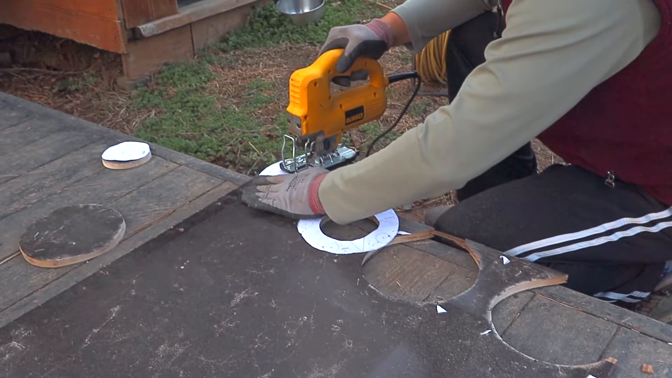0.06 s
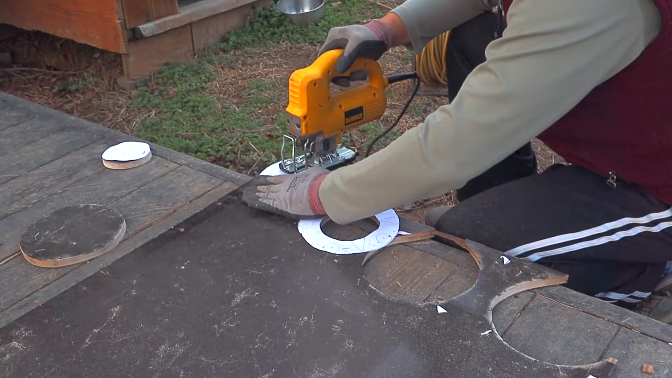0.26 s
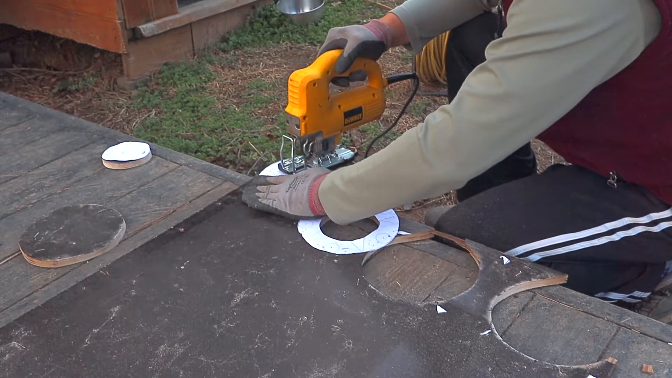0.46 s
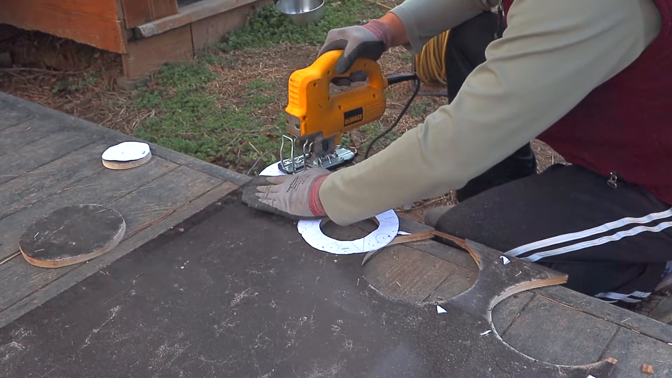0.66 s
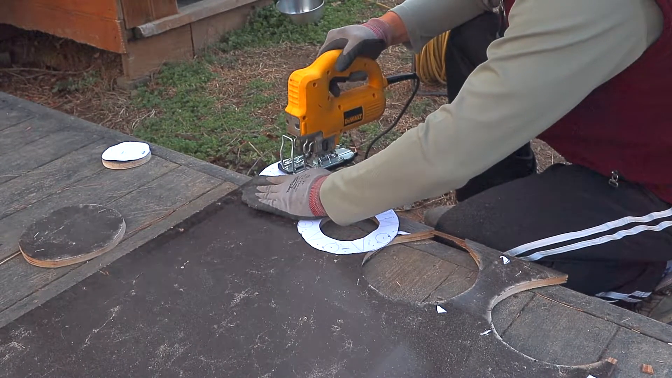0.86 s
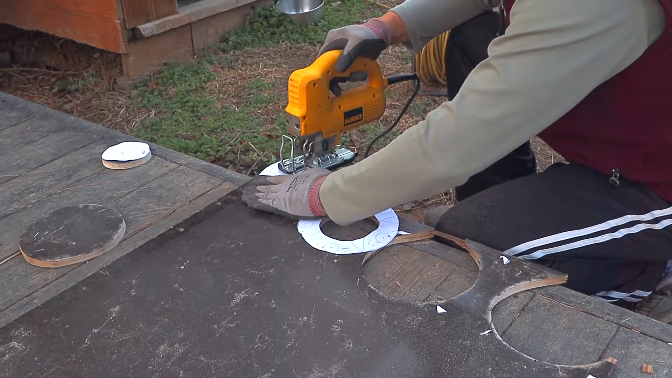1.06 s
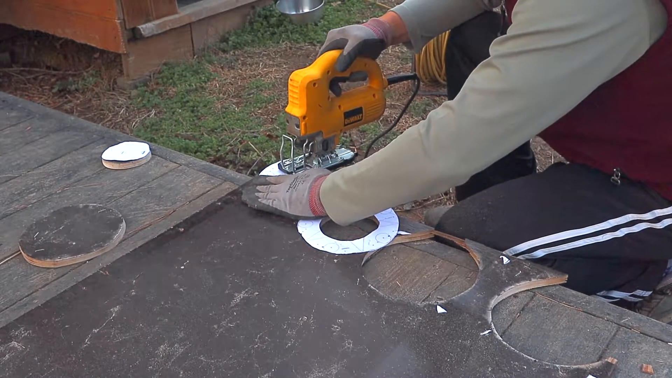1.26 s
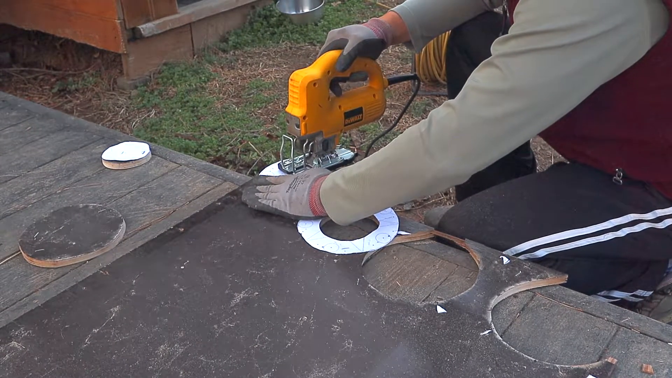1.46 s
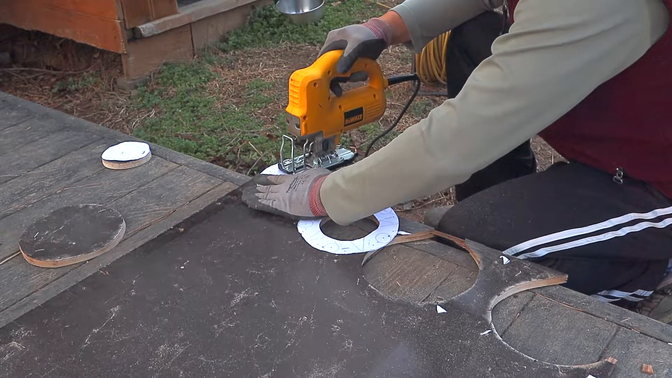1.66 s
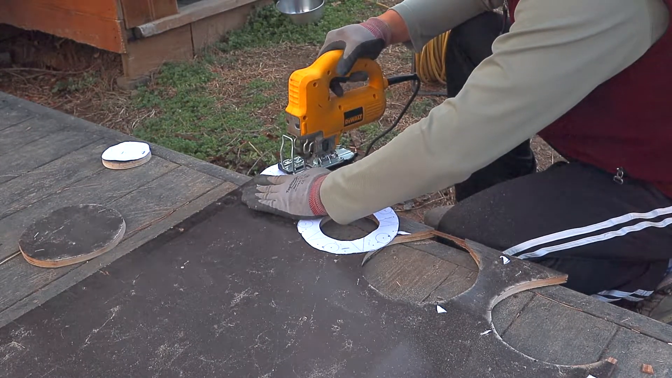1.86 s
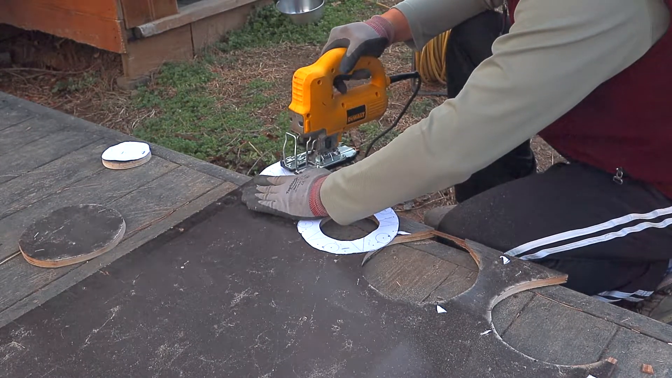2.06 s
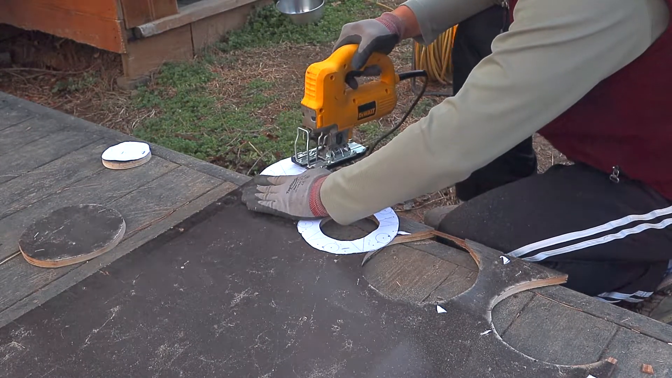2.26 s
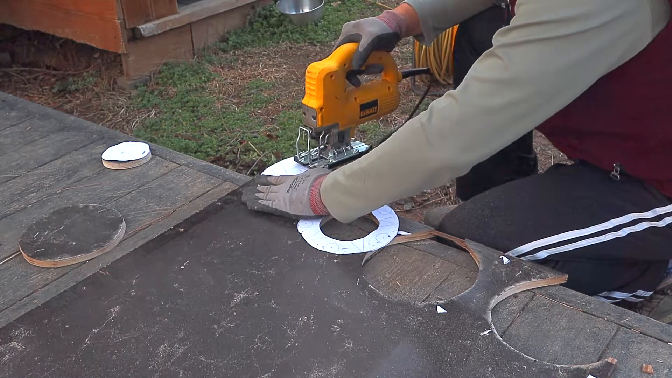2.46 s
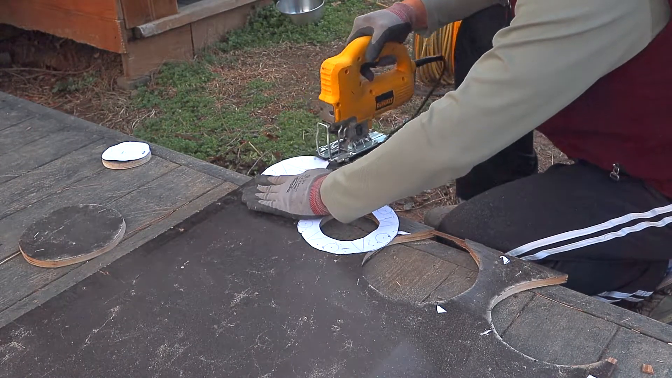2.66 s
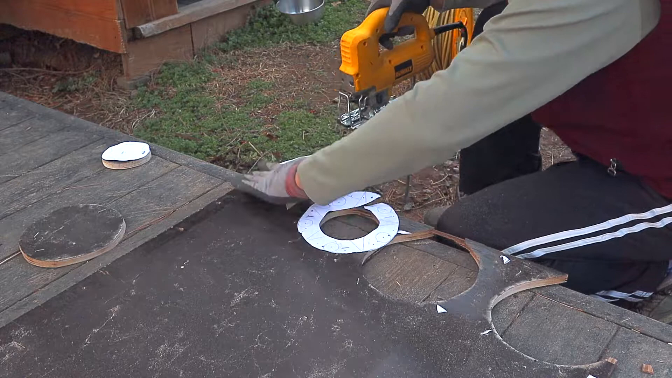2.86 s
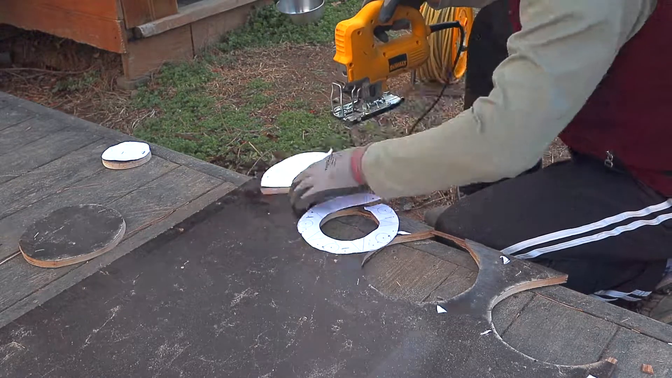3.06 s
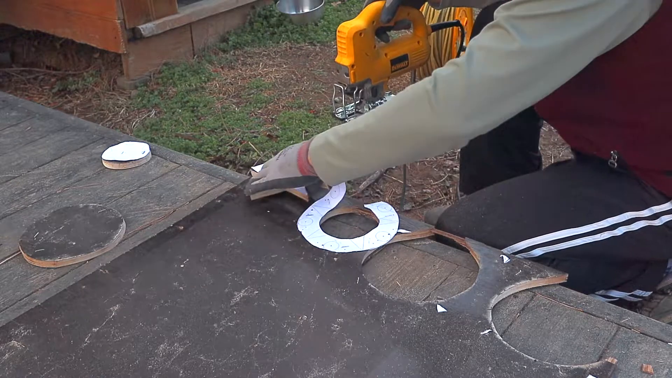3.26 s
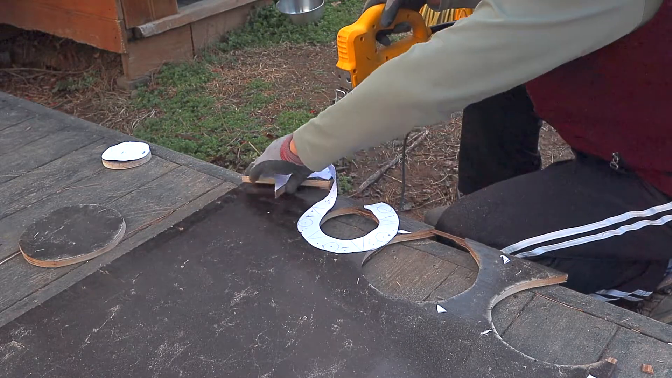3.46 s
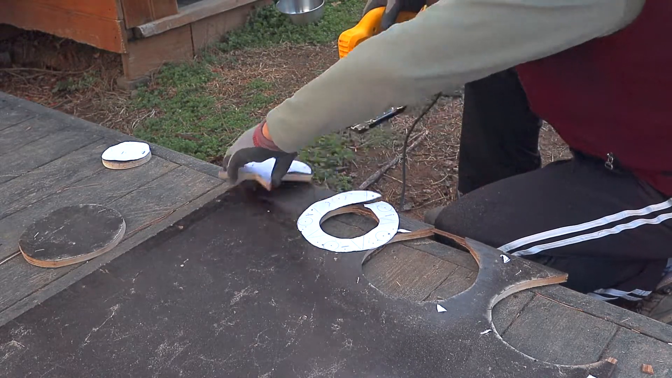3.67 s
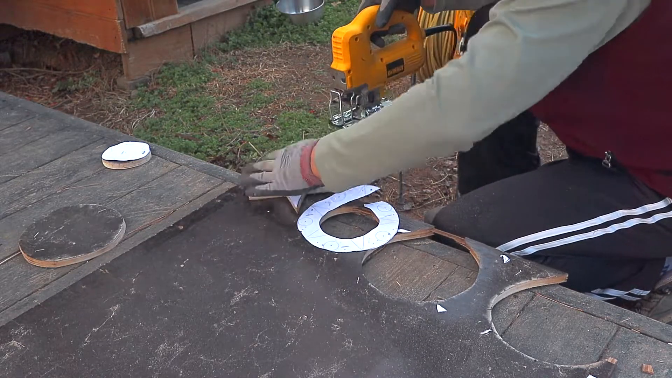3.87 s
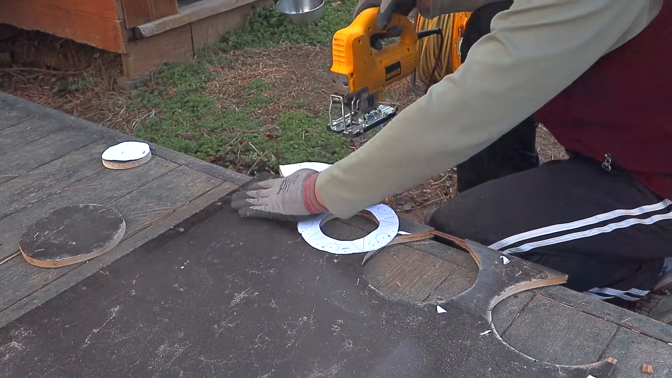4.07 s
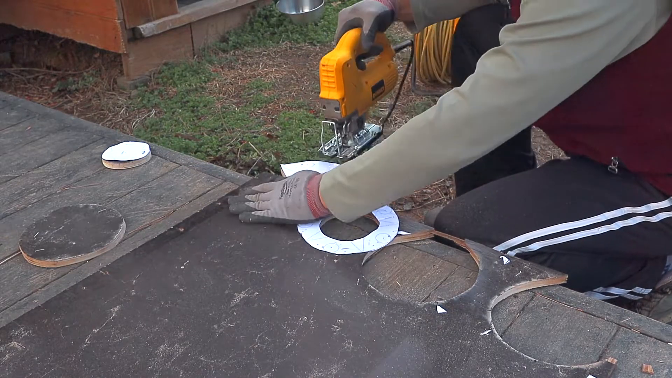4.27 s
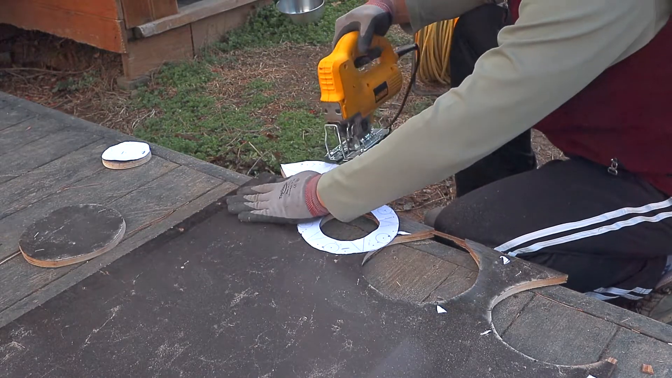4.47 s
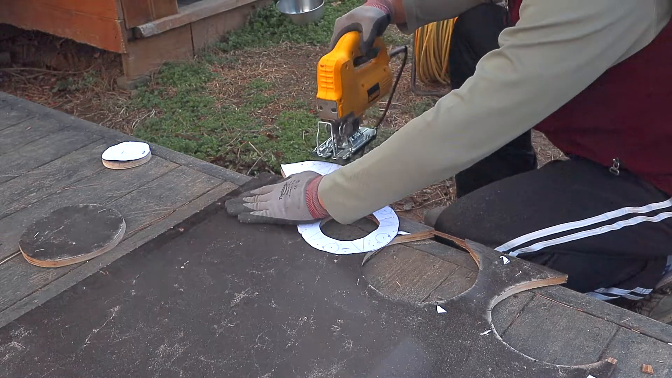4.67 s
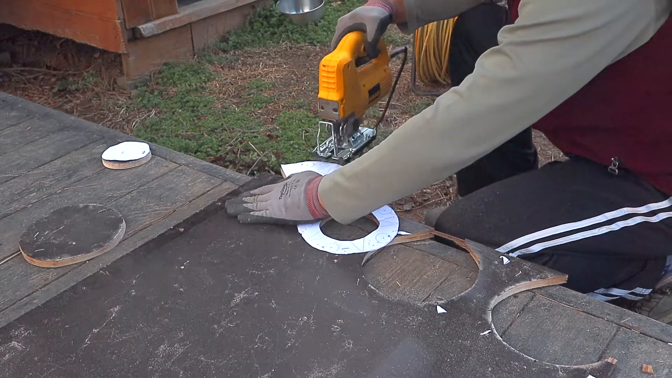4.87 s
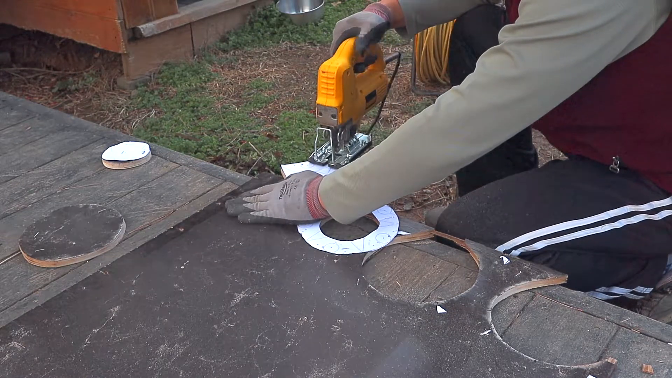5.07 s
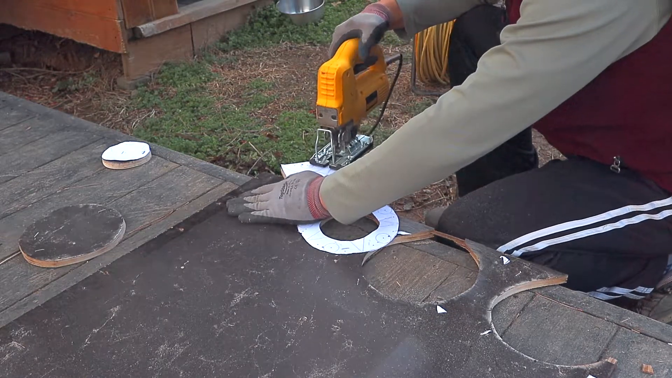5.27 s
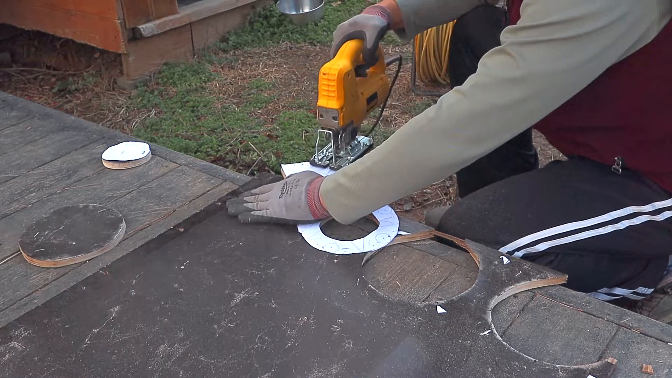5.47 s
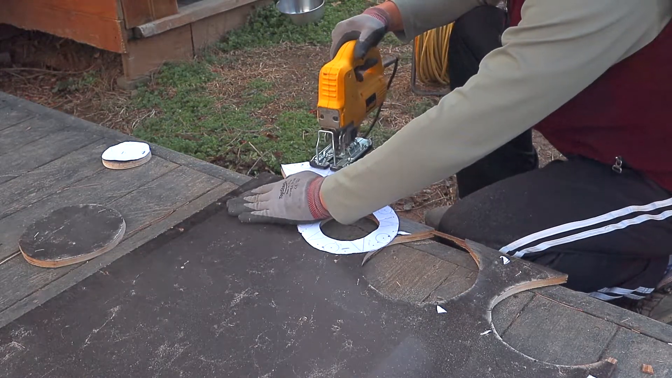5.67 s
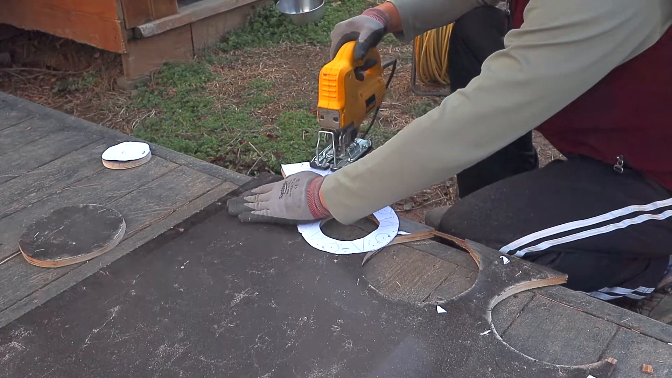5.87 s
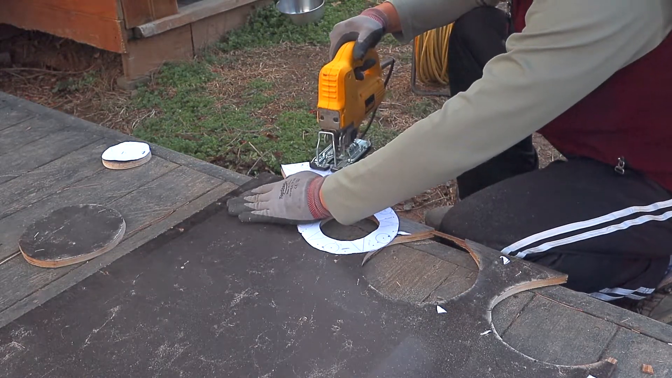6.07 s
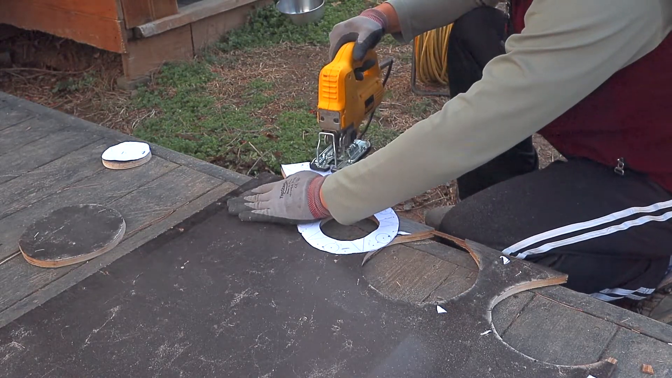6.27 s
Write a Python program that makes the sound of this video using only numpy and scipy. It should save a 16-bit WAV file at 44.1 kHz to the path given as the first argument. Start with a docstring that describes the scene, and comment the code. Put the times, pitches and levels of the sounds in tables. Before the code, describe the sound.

Outdoors, a buzzing jigsaw finishes a metal cut and winds down; after clanks, sliding and faint bird calls it restarts with a sharp whine.

```python
"""Jigsaw in sheet metal

A corded jigsaw finishes a cut in thin sheet metal on a wooden deck outdoors and coasts to a stop;
the cut ring is knocked and slid while a bird calls far off, then the saw restarts and touches the metal.
One stroke rate drives all tones, clacks and slaps of the saw. Blows excite decaying modes of the sheet,
sliding is filtered noise, the bird is a harmonic glide, and the air is shaped noise with a faint hum."""
import sys
import numpy as np
from scipy import signal
from scipy.fft import rfft, irfft, next_fast_len
from scipy.io import wavfile
from scipy.ndimage import uniform_filter1d

SR = 44100
rng = np.random.default_rng(int(sys.argv[2]) if len(sys.argv) > 2 else 0)


def store_pcm(level_fs):
    """Save levels as 16-bit WAV."""
    pcm = np.round(np.clip(level_fs, -1, 1) * 32767).astype(np.int16)
    wavfile.write(sys.argv[1], SR, np.atleast_2d(pcm).T)


N = 278271
TIME = np.arange(N) / SR

# outdoor air: f/Hz, relative spectral level/dB
AIR_SPECTRUM = [(30, -13), (50, -3.5), (110, -3), (230, 3.5), (330, 1.5), (430, 3), (560, -2.5),
                (1200, -4.5), (2200, -2), (3500, -10), (8000, -16), (16000, -16)]
AIR_DB = -51.5
HUM_HZ, HUM_DB = 394.5, -54  # mean pitch and level; both waver

# speed of the blade as the cut gives way: t/s, stroke rate/(1/s)
CUT_STROKE_RATE = [(0, 95.6), (.33, 96.0), (.42, 96.6), (.56, 97.3), (.7, 99.5)]
# coasting: switch-off, air-drag time constant (s), dry friction (strokes per s lost each second)
OFF_S, DRAG_S, FRICTION_PER_S = .773, 1.578, 37.0
# restart (s), free speed (strokes per s), then share and time constant (s) of two run-up stages
ON_S, FREE_SPEED = 4.443, 101.8
QUICK_SHARE, QUICK_S, SLOW_SHARE, SLOW_S = .83, .112, .17, .34
# one brief dip of the whine's pitch: centre (s), half length (s), depth (strokes per s)
DIP_S, DIP_LENGTH_S, DIP_DEPTH = 5.195, .04, 4.2
GEAR_RATIO = 9.07  # armature turns per stroke
QUIET_SPEED = (3.8, 39)  # strokes per s below which parts hardly sound, (first, second) run

# the saw heard from its side, then from its front: f/Hz, relative spectral level/dB
SIDE_SPECTRUM = [(60, -62), (150, -38), (400, -12.5), (850, -4.5), (1250, 4.5), (1600, 4.5), (2350, 3),
                 (2650, 9), (3400, 11), (4050, 8), (4900, 11), (5700, 6.5), (6400, 8.5), (7350, 7.5),
                 (8200, -1.5), (9300, -2), (10600, 2), (11100, -7.5), (11900, -4.5), (13800, -5.5),
                 (14800, -6), (15700, -3)]
FRONT_SPECTRUM = [(100, -69), (450, -17), (800, -9), (1150, -3), (2300, -2), (2600, 1.5), (3500, 5),
                  (4750, 4.5), (5200, 2), (5800, 5), (7000, 5), (8450, -5), (9300, 4.5), (10300, -1),
                  (11400, -6.5), (12400, -3), (13600, -3.5), (15600, -0.5)]
# resonances of guide and housing: f/Hz, bandwidth/Hz, relative level/dB
HOUSING_MODES = [(390, 16, 21.5), (1230, 78, 7.5), (3540, 76, 1), (4840, 220, 3), (6440, 123, 5.5),
                 (10560, 69, -0.5)]
# resonances of blade and guard, heard toward the front: f/Hz, bandwidth/Hz, relative level/dB
GUARD_MODES = [(2544, 33, 11), (2734, 30, 17), (3400, 130, 4), (4300, 35, 16.5), (4770, 130, -1),
               (6600, 230, -19), (9200, 190, -6.5), (9760, 390, -8)]
# passages where the parts rattle harder: t/s, half length/s, gain/dB
JOLTS_OF_RATTLE = [(0.827, 0.12, 2), (4.535, 0.025, 1)]
# base level at free speed in the (first, second) run in dB, and the power of speed it grows with
RATTLE_DB, RATTLE_POWER = (-26.5, -24), 0.45
BODY_DB, BODY_POWER = (-27, -22.5), 0.31
HISS_DB, HISS_POWER = (-31, -25), 0.73
CUT_DAMPING_DB = -0.5  # the sheet steadies the blade and damps its rattle
REPEAT_DB = (-1, 3)  # part of each clack alike on every stroke, (first, second) run
# gains at restart from the starting torque, and its decay time constant
SURGE_BODY_DB, SURGE_RATTLE_DB, SURGE_HISS_DB, SURGE_WHINE_DB, SURGE_S = 10, 14.5, 10, 16, 0.39

# hum of the armature: multiple of armature rate, relative level/dB
ARMATURE_HARMONICS = [(1, 0), (2, -8), (3, -1)]
# growl under the starting current: multiple of armature rate, relative level/dB
START_HARMONICS = [(1, -.5), (3, -2), (12, 7)]
# whine of the armature: multiple of armature rate, relative level/dB
WHINE_HARMONICS = [(18, 0)]
ARMATURE_DB, ARMATURE_POWER = (-52, -45), 0.48
# second tone: multiple of the stroke rate, level in the (first, second) run
OVERHUM_RATIO, OVERHUM_DB = 9.65, (-45.5, -47)
START_DB, START_FADE_DB_PER_S = -30, 32
WHINE_DB, WHINE_POWERS = (-34, -33.5), (2.4, 1.0)  # before swell and surge; (first, second) run
# the whine swells near a motor resonance: centre and half width (strokes per s), gain
SWELL_SPEED, SWELL_WIDTH, SWELL_DB = 96, 5.7, 14.5

# sheet flapping on the boards: f/Hz before the pinch, bandwidth/Hz, relative level/dB
FLAP_MODES = [(178, 25, -0.5), (298, 44, -3.5), (533, 126, -1.5), (712, 79, -2.5), (1157, 120, 0),
              (1650, 87, 7.5), (1746, 125, 4), (2100, 250, -2), (2610, 130, -6.5), (2900, 180, -8.5),
              (3670, 130, -11), (3600, 2500, -16)]
# upper sheet resonances as the blade nears the edge: t/s, frequency factor, level change/dB
PINCH_CURVE = [(0, 1.02, 0.5), (.15, 1.0, -0.5), (.205, 1, -4), (.25, 1.0, -2), (.42, 0.97, 0),
               (.5, 1.01, 0.5), (.57, 1.11, 0), (.64, 1.04, -2.5), (.69, 0.88, -14)]
PINCH_ABOVE_HZ, SHIFT_ABOVE_HZ = 1000, 1450  # level and pitch change only above these
# hard first strokes: until (s), easing over (s), affected above (Hz), gain
HARD_BITE_S, HARD_BITE_EASE_S, HARD_BITE_ABOVE_HZ, HARD_BITE_DB = .21, .06, 2400, 4
# the blade bites ever more lightly and leaves the sheet; release ends at CUT_END_S
BITE_DB, BITE_EASE_DB_PER_S, CUT_END_S, CUT_RELEASE_S = -27.5, 5.5, 0.74, 0.1
# running blade touching the metal: start t/s, length/s, level/dB
BLADE_TOUCHES = [(6.132, 0.15, -40), (6.248, 0.077, -32.5)]
TOUCH_GRIT_DB = 1  # teeth grazing the edge

# body shake heard from the side: multiple of stroke rate, relative level/dB
SIDE_SHAKE_HARMONICS = [(1, -9), (2, -6), (3, 0), (4, -1), (5, 0), (6, -3), (7, -4), (8, -2), (10, -3),
                        (11, -3), (12, -3)]
# body shake heard from the front: multiple of stroke rate, relative level/dB
FRONT_SHAKE_HARMONICS = [(1, -2), (2, -9), (5, 1), (6, 1), (7, 6), (10, 10), (11, 12), (12, 11), (17, 5),
                         (21, 5), (24, 13), (25, 14), (29, 13), (36, 14), (39, 14), (41, 14), (45, 13)]
SHAKE_DB, SHAKE_POWER = (-53.5, -58), 0.34

# bearing song: multiple of ball-passing rate, relative level/dB
BEARING_HARMONICS = [(1, -7), (2, -7), (3, -6), (4, 2), (5, -5), (6, -8), (7, -8), (8, -10)]
# balls slip more at speed: stroke rate/(1/s), balls passing per armature turn
BALLS_PER_TURN = [(10, 9.1), (50, 8.47)]
# knocks of the slowing slider in its guide: t/s, click level/dB
GUIDE_KNOCKS = [(1.762, -19), (1.783, -22), (1.802, -19), (1.843, -13), (1.889, -13), (1.902, -20),
                (1.941, -14), (1.971, -21), (2.003, -21), (2.037, -19), (2.079, -21), (2.11, -23)]
# the song weakens above this speed (strokes per s); base level, power of speed
BEARING_SPEED, BEARING_DB, BEARING_POWER = 76, -32.5, .42
# balls skid loudest near rest: centre and half width (strokes per s), gain
SQUEAL_SPEED, SQUEAL_WIDTH, SQUEAL_DB = 8, 8.5, 9

# stick-slip groans of the sheet: start t/s, length/s, f/Hz, level/dB
SHEET_GROANS = [(2.214, 0.015, 495, -39), (2.529, 0.036, 513, -32), (2.645, 0.024, 517, -38),
                (2.663, 0.025, 520, -33)]
# overtones of a groan: multiple of its pitch, relative level/dB
GROAN_HARMONICS = [(1, 0), (2, -3.5), (3, -16)]
# sheet and saw knocking on the deck: t/s, level/dB, brightness/dB per range, board thump/dB
DECK_KNOCKS = [(2.214, -43, -12, -42), (2.315, -60, 22, -70), (2.533, -39, -11.5, -40.5),
               (2.582, -29.5, 5, -45), (2.688, -27, 8, -39), (2.701, -34.5, 21, -62), (2.718, -30, 13, -41),
               (2.733, -34, 1, -40), (3.101, -29, 2, -37), (3.136, -8.5, -2, -31), (3.165, -41, -6, -31.5),
               (3.305, -28.5, 14, -45), (3.387, -41, 12, -54), (3.825, -19, 6, -50), (3.832, -36, 7, -26.5),
               (3.885, -30.5, 2, -44), (4.047, -38.5, -14, -59), (4.065, -18, -2.5, -23.5),
               (4.117, -27, 2, -44), (4.147, -33, -4, -61), (4.182, -33, 1, -50), (4.355, -47, 13, -55),
               (4.362, -47, 11, -60), (4.368, -52, 7, -62), (4.396, -28, 10.5, -36.5),
               (4.454, -28.5, 3, -57), (4.463, -31.5, 10, -54), (4.471, -32, -8, -58)]
# the four ranges of a knock: low f/Hz, high f/Hz, t60/s, relative level/dB
KNOCK_RANGES = [(108, 276, 0.26, 0), (360, 2600, 0.07, -3), (1560, 5600, 0.03, -4),
                (5030, 14000, 0.019, -7)]
# modes of the sheet lying on the boards: f/Hz, relative level/dB, t60/s
SHEET_MODES = [(128, -5.5, 0.12), (166, -3.5, 0.35), (216, 7.5, 0.12), (455, 1.5, 0.15), (503, 4.5, 0.086),
               (787, -1.5, 0.088), (1023, -4, 0.088), (1264, -3.5, 0.051), (1697, -2, 0.039),
               (2186, 5, 0.019), (2960, 8.5, 0.0074), (3680, 7, 0.0086), (4170, 0, 0.021),
               (4020, -11, 0.048), (5300, -12.5, 0.054), (6350, -18, 0.098)]
KNOCK_RING_DB = 4  # the sheet rings most readily in the upper middle range
# distant bird calls: t/s, length/s, target f/Hz, level/dB
BIRD_CALLS = [(2.24, 0.1, 1140, -47), (2.639, 0.045, 1210, -46), (3.399, 0.068, 1077, -37.5),
              (3.539, 0.082, 1145, -42), (3.727, 0.085, 1090, -42), (4.194, 0.074, 1110, -48.5)]
# overtones of the call: multiple of its pitch, relative level/dB
BIRD_HARMONICS = [(1, -5), (2, 4), (3, -14), (4, -9)]
BIRD_SCOOP, BIRD_SCOOP_S = 0.1236, 0.0179  # start below pitch (share), time constant of the rise
# metal and glove sliding: start t/s, length/s, rumble level/dB, hiss level/dB
SLIDING_PUSHES = [(2.641, 0.13, -31.5, -42), (2.683, 0.022, -40, -28), (2.845, 0.14, -47, -46),
                  (3.242, 0.1, -42, -42), (3.347, 0.25, -48.5, -41), (3.559, 0.23, -48, -42.5),
                  (3.625, 0.06, -71, -37), (4.025, 0.21, -33, -29.5), (4.054, 0.055, -30, -49),
                  (4.21, 0.22, -54.5, -50.5)]
# rumble of the boards: f/Hz, relative spectral level/dB
RUMBLE_SPECTRUM = [(30, -8), (50, 17), (90, 1), (160, 11.5), (300, 7), (600, 8.5), (1200, 12), (2400, 10),
                   (4000, -19), (8000, -38)]
# hiss of the sliding metal: f/Hz, relative spectral level/dB
HISS_SPECTRUM = [(500, -32), (1500, -9), (3000, 0.5), (6000, -2), (8000, -1.5), (10300, -4.5),
                 (13000, -6.5), (15700, -1)]
PUSH_RISE, PUSH_FALL = 0.29, 0.47  # shares of the length of a push
# resonances of the saw's shoe: f/Hz, bandwidth/Hz, relative level/dB
SHOE_MODES = [(1570, 360, 2), (2160, 100, -8), (2690, 130, -2), (4220, 140, 2), (5670, 200, -1),
              (8050, 300, 3), (10000, 1100, 5.5), (12000, 900, 0), (14300, 1800, -9)]
SKID_S, SKID_LENGTH_S, SKID_DB = 4.05, 0.17, -26.5
CUTOFF_HZ = 15780


def from_db(db):
    """Logarithmic level: 20 dB is a tenfold amplitude."""
    return 10 ** (np.asarray(db) / 20)


def rms_one(x):
    """Normalization of power: scale to rms 1."""
    return x / np.sqrt(np.mean(x ** 2) + 1e-20)


def steady_level(x):
    """Short-time power: rms over a tenth of a second."""
    return np.sqrt(uniform_filter1d(x ** 2, SR // 10) + 1e-12)


def in_time(rows):
    """Linear interpolation: the columns of a curve at every sample."""
    s, *columns = np.transpose(rows)
    return [np.interp(TIME, s, c) for c in columns]


def drift(rate):
    """Random modulation of spread 1: Gaussian values joined by lines, rate of them per second."""
    knots = rng.standard_normal(N // 20)
    return np.interp(TIME * rate, np.arange(len(knots)), knots) * np.sqrt(3 / 2)


def band(x, low_hz, high_hz):
    """Band-pass filtering: keep the energy between two frequencies."""
    edges = [low_hz, min(high_hz, SR / 2 - 100)]
    return signal.sosfilt(signal.butter(3, edges, "band", fs=SR, output="sos"), x)


def colour(x, spectrum):
    """Spectral shaping: weight the Fourier components of a noise; rms 1."""
    size = next_fast_len(N)
    hz, db = np.transpose(spectrum)
    bins = np.maximum(np.arange(size // 2 + 1) * SR / size, 1)
    gain = from_db(np.interp(np.log(bins), np.log(hz), db)) * np.minimum(bins / hz[0], 1) ** 2
    return rms_one(irfft(rfft(x, size) * gain, size)[:N])


def resonate(x, modes):
    """Modal superposition: parallel damped resonators with alternating signs."""
    out = 0
    for k, (hz, width, db) in enumerate(modes):
        r = np.exp(-np.pi * width / SR)
        poles = [1, -2 * r * np.cos(2 * np.pi * hz / SR), r * r]
        ringing = signal.lfilter([1, 0, -1], poles, x + 1e-18)
        out = out + (-1) ** k * from_db(db) * (1 - r * r) / 2 * ringing
    return out


def contacts(turns, jitter_s, spread_db):
    """Periodic impact: one click per whole turn, uneven in time and strength."""
    at = np.flatnonzero(np.diff(np.floor(turns)) > 0)
    chance = rng.standard_normal((N // 40, 2))[:len(at)]
    late = np.round(chance[:, 0] * jitter_s * SR).astype(int)
    clicks = np.zeros(N)
    clicks[np.clip(at + late, 0, N - 1)] = from_db(spread_db * chance[:, 1])
    return clicks


def burst(clicks, decay_s):
    """Impact noise: each click sets off an exponentially decaying puff of noise."""
    envelope = signal.lfilter([1], [1, -np.exp(-1 / (decay_s * SR))], clicks + 1e-18)
    return envelope * rng.standard_normal(N)


def tones(turns, orders, waver_db, waver_hz, slip):
    """Rotational harmonics, wavering in level and phase; those above half the sample rate are silent."""
    play = slip * drift(160)  # in turns, shared by all lines
    rate = np.gradient(turns) * SR
    lines = 0
    for k, db in orders:
        level = from_db(db + waver_db * drift(waver_hz)) * (k * rate < SR / 2)
        lines = lines + level * np.sin(2 * np.pi * (round(k) * (turns + play) + rng.random()))
    return lines


def by_run(first, second):
    """Step in time: one value until the saw is switched on again, another after."""
    return np.where(TIME < ON_S, first, second)


def gain_at(speed, run_db, power):
    """Power law of machine noise: gain grows with speed and vanishes near standstill."""
    moving = 1 - np.exp(-(speed / by_run(*QUIET_SPEED)) ** 3)
    return from_db(by_run(*run_db)) * (speed / FREE_SPEED + 1e-9) ** power * moving


def push(start, length):
    """Force envelope: swell, hold and ease of one push."""
    u = (TIME - start) / length
    return np.clip(np.minimum(u / PUSH_RISE, (1 - u) / PUSH_FALL), 0, 1)


def in_cut():
    """Contact condition: 1 while the blade is in the sheet, 0 once it is free."""
    return np.clip((CUT_END_S - TIME) / CUT_RELEASE_S, 0, 1)


def surge():
    """Starting torque: 1 when the saw is switched on again, then exponential decay."""
    return by_run(0, np.exp(-np.maximum(TIME - ON_S, 0) / SURGE_S))


def blade_speed():
    """Drag and dry friction slow the blade to rest; exponential stages run it up (strokes per s)."""
    friction = FRICTION_PER_S * DRAG_S
    fade = np.exp(-np.maximum(TIME - OFF_S, 0) / DRAG_S)
    first = (in_time(CUT_STROKE_RATE)[0] + friction) * fade - friction
    since_on = np.maximum(TIME - ON_S, 0)
    quick = QUICK_SHARE * (1 - np.exp(-since_on / QUICK_S))
    slow = SLOW_SHARE * (1 - np.exp(-since_on / SLOW_S))
    dip = DIP_DEPTH * np.exp(-((TIME - DIP_S) / DIP_LENGTH_S) ** 2)
    return np.maximum(by_run(first, FREE_SPEED * (quick + slow) - dip), 0)


def yard():
    """Ambient sound: broadband noise of outdoor air and a faint hum with slight wavering."""
    level = from_db(HUM_DB + 1.2 * drift(3))
    hum = level * np.sin(2 * np.pi * np.cumsum(HUM_HZ + .8 * drift(8)) / SR)
    return from_db(AIR_DB) * colour(rng.standard_normal(N), AIR_SPECTRUM) + hum


def clacking(turns, repeat_db):
    """Impact at both ends of the slider's travel: part noise, part one ring repeated every stroke."""
    out, t = 0, np.arange(SR // 100) / SR
    for end in (0, .5):
        hits = contacts(turns - end, jitter_s=.00005, spread_db=1.3)
        ring = rng.standard_normal(len(t)) * np.exp(-t / 0.0016)
        repeated = signal.oaconvolve(hits, ring)[:N]
        out = out + burst(hits, decay_s=0.0014) + from_db(repeat_db) * repeated
    return out


def rasp(turns, speed, spectrum, modes, clack_db, teeth_db, housing_db, repeat_db):
    """Impact and flow noise: the slider clacks, gear teeth rattle and ring the saw, the fan rushes."""
    clacks = clacking(turns, repeat_db)
    tooth_hits = contacts(GEAR_RATIO * turns, jitter_s=.0002, spread_db=3.0)
    teeth = burst(tooth_hits, decay_s=.00042)
    sparse = np.sqrt(100 / np.maximum(speed, 28))  # slow strokes stand out singly and let it ring
    drive = rng.standard_normal(N) + sparse * (from_db(clack_db) * clacks + from_db(teeth_db) * teeth)
    ringing = rms_one(resonate(clacks / 2 + teeth, modes))
    sound = colour(drive + from_db(housing_db) * sparse ** 2 * ringing, spectrum)

    # split into three ranges and even out their slow level, so that the gains below set it
    low = signal.sosfiltfilt(signal.butter(4, 8200, fs=SR, output="sos"), sound)
    body = signal.sosfiltfilt(signal.butter(4, 2300, fs=SR, output="sos"), sound)
    evened = 1 / steady_level(band(low, 2500, 8000))
    high = sound - low
    hiss = high / steady_level(band(high, 8500, 14500))

    jolt_db = sum(db * np.exp(-((TIME - s) / length) ** 2) for s, length, db in JOLTS_OF_RATTLE)
    rattle_db = SURGE_RATTLE_DB * surge() + jolt_db + CUT_DAMPING_DB * in_cut()
    body_gain = gain_at(speed, BODY_DB, BODY_POWER) * from_db(SURGE_BODY_DB * surge())
    rattle_gain = gain_at(speed, RATTLE_DB, RATTLE_POWER) * from_db(rattle_db)
    hiss_gain = gain_at(speed, HISS_DB, HISS_POWER) * from_db(SURGE_HISS_DB * surge())
    return body * evened * body_gain + (low - body) * evened * rattle_gain + hiss * hiss_gain


def motor(turns, speed):
    """Rotational harmonics: armature hum, a second tone just above, starting growl and high whine."""
    armature = GEAR_RATIO * turns
    hum = tones(armature, ARMATURE_HARMONICS, waver_db=2.0, waver_hz=60, slip=.025)
    hum *= gain_at(speed, ARMATURE_DB, ARMATURE_POWER)
    overhum = tones(OVERHUM_RATIO * turns, [(1, 0)], waver_db=3, waver_hz=12, slip=.04)
    hum += overhum * gain_at(speed, OVERHUM_DB, ARMATURE_POWER)
    growl = tones(armature, START_HARMONICS, waver_db=3, waver_hz=40, slip=.02)
    growl *= gain_at(speed, (START_DB, START_DB), 0)
    hum += growl * by_run(0, from_db(-START_FADE_DB_PER_S * np.maximum(TIME - ON_S, 0)))

    whine = tones(armature, WHINE_HARMONICS, waver_db=2.5, waver_hz=90, slip=.003)
    # a weaker neighbouring line in the second run
    whine += by_run(0, 1) * tones(armature, [(17, -13)], waver_db=3, waver_hz=30, slip=.01)
    swell = from_db(SWELL_DB * np.exp(-((speed - SWELL_SPEED) / SWELL_WIDTH) ** 2))
    whine_gain = swell * from_db(SURGE_WHINE_DB * surge())
    whine_gain = whine_gain * gain_at(speed, WHINE_DB, by_run(*WHINE_POWERS))
    return band(hum, 510, 6000) + whine * whine_gain


def flapping(slaps):
    """Modal response under changing constraint: the pinch sets pitch and strength of each slap's ring."""
    factor, upper_db = in_time(PINCH_CURVE)
    hard_db = HARD_BITE_DB * np.clip((HARD_BITE_S - TIME) / HARD_BITE_EASE_S, 0, 1)
    out, impulse = np.zeros(N), signal.unit_impulse(SR // 10)
    for at in np.flatnonzero(slaps * in_cut()):
        modes = []
        for hz, width, db in FLAP_MODES:
            shifted_hz = hz * (factor[at] if hz > SHIFT_ABOVE_HZ else 1)
            # upper resonances are never twice alike
            pinch_db = (upper_db[at] + rng.standard_normal()) * (hz > PINCH_ABOVE_HZ)
            bite_db = hard_db[at] * (hz > HARD_BITE_ABOVE_HZ)
            modes.append((shifted_hz, width, db + pinch_db + bite_db))
        out[at:at + len(impulse)] += slaps[at] * resonate(impulse, modes)
    return out


def cutting(turns, snap_db, grit_db, touch_hz, grit_touch=2.8):
    """Impact excitation: upstrokes lift the sheet and slap it down while the teeth tear through."""
    slaps = contacts(turns - .02, jitter_s=.00002, spread_db=.8)
    no_bass = signal.butter(8, 165, "high", fs=SR, output="sos")  # a small sheet radiates no bass
    drumming = signal.sosfilt(no_bass, resonate(slaps, FLAP_MODES))
    flap = signal.sosfilt(no_bass, flapping(slaps)) / np.std(drumming)
    snap = rms_one(band(slaps, 1120, 9500))
    grit = rms_one(band(burst(slaps, decay_s=.0025), 900, 9000))
    teeth = from_db(snap_db) * snap + from_db(grit_db) * grit
    full = flap + teeth * from_db(in_time(PINCH_CURVE)[1])
    bite = from_db(BITE_DB - BITE_EASE_DB_PER_S * TIME) * in_cut()

    # a light touch drums the sheet on the boards, with puffs of noise and grit
    puffs = rms_one(burst(slaps, decay_s=0.0051))
    touch = rms_one(band(rms_one(drumming) + grit_touch * puffs, 377, touch_hz))
    touch += from_db(TOUCH_GRIT_DB) * rms_one(band(grit, 900, 3500))
    touch_gain = sum(from_db(db) * push(s, length) for s, length, db in BLADE_TOUCHES)
    return bite * full + touch * touch_gain


def shaking(turns, speed):
    """Inertial reaction: out of the cut, the slider shakes the whole body at stroke harmonics."""
    side = tones(turns, SIDE_SHAKE_HARMONICS, waver_db=2.5, waver_hz=10, slip=.006)
    front = tones(turns, FRONT_SHAKE_HARMONICS, waver_db=1.5, waver_hz=10, slip=.006)
    heard = by_run(band(side, 100, 2400), front)
    return heard * (1 - in_cut()) * gain_at(speed, SHAKE_DB, SHAKE_POWER)


def coasting(turns, speed):
    """Ball-passing harmonics: a bearing sings, swelling twice a stroke; the slack slider knocks."""
    balls = np.cumsum(GEAR_RATIO * speed * np.interp(speed, *np.transpose(BALLS_PER_TURN))) / SR
    song = tones(balls, BEARING_HARMONICS, waver_db=4.5, waver_hz=28, slip=.075)
    slow = by_run(1, 0) * gain_at(speed, (BEARING_DB, BEARING_DB), BEARING_POWER)
    slow = slow / (1 + (speed / BEARING_SPEED) ** 4)
    slow *= from_db(SQUEAL_DB * np.exp(-((speed - SQUEAL_SPEED) / SQUEAL_WIDTH) ** 2))
    load = .5 + np.abs(np.sin(2 * np.pi * turns))
    clicks = np.zeros(N)
    for s, db in GUIDE_KNOCKS:
        clicks[round(s * SR)] = from_db(db)
    slack = burst(clicks, decay_s=.0014)
    treble_loss = signal.butter(1, 9000, fs=SR, output="sos")
    dulled = signal.sosfilt(treble_loss, slow * load * song + slack)
    return band(dulled + 3 * resonate(slack, HOUSING_MODES), 2400, 14000)


def groans():
    """Stick-slip oscillation: the dragged sheet judders at a pitch near its 500 Hz mode."""
    out = 0
    for s, length, hz, db in SHEET_GROANS:
        judder = tones(hz * TIME, GROAN_HARMONICS, waver_db=2, waver_hz=200, slip=.03)
        out = out + from_db(db) * push(s, length) * judder
    return out


def knocks(modes_db, crack_db, snap_db, tail_db, tail_t60):
    """Impulse response: each blow rings sheet modes and a crack of dense, short modes with a faint tail."""
    out, t = np.zeros(N + SR), np.arange(SR // 2) / SR
    centres = [np.log(low * high) / 2 for low, high, t60, db in KNOCK_RANGES]
    for s, level_db, bright_db, thump_db in DECK_KNOCKS:
        levels = [thump_db, level_db - bright_db, level_db + KNOCK_RING_DB, level_db + bright_db]
        contact = rng.standard_normal(len(t)) * np.exp(-t / 0.00071)  # hard first touch
        blow = from_db(levels[-1] + snap_db) * band(contact, 1000, 16600)
        for hz, db, t60 in SHEET_MODES:
            strength = np.interp(np.log(hz), centres, levels) + db + modes_db + rng.normal(0, 3.0)
            mode = from_db(strength - 60 * t / t60) * np.sin(2 * np.pi * hz * t)
            blow = blow + rng.choice([-1, 1]) * mode
        for level, (low, high, t60, db) in zip(levels, KNOCK_RANGES):
            fade = from_db(-60 * t / t60) + from_db(tail_db - 60 * t / tail_t60)
            crack = band(rng.standard_normal(len(t)) * fade, low, high)
            crack = crack * np.sqrt(SR / 2 / (high - low))  # equal power in any bandwidth
            blow = blow + from_db(level + db + crack_db) * crack
        at = round(s * SR)
        out[at:at + len(t)] += blow
    return out[:N]


def deck(boom_db, boom_t60):
    """Reverberant decay: the deck booms on in low-frequency noise after each thump."""
    weight = 0
    for s, level_db, bright_db, thump_db in DECK_KNOCKS:
        decay = from_db(thump_db - 60 * np.maximum(TIME - s, 0) / boom_t60)
        weight = weight + decay * np.clip((TIME - s) / 0.072, 0, 1)
    return from_db(boom_db) * weight * rms_one(band(rng.standard_normal(N), 37, 80))


def bird(hoarse, echo_db, echo_t60):
    """Harmonic glide and scattering: short rising yelps, smeared by the surroundings."""
    out = np.zeros(N)
    for s, length, hz, db in BIRD_CALLS:
        on = (TIME > s) & (TIME < s + length)
        t = TIME[on] - s
        pitch = hz * (1 - BIRD_SCOOP * np.exp(-t / BIRD_SCOOP_S)) * (1 + hoarse * drift(500)[on])
        phase = 2 * np.pi * np.cumsum(pitch) / SR
        voice = sum(from_db(level) * np.sin(round(k) * phase) for k, level in BIRD_HARMONICS)
        out[on] += from_db(db) * np.sin(np.pi * t / length) * voice
    echo = rng.standard_normal(SR) * from_db(-60 * TIME[:SR] / echo_t60)
    return out + from_db(echo_db) * signal.fftconvolve(out, echo / np.linalg.norm(echo))[:N]


def slides(grain_db, grain_hz, ring_db, catch_db, catch_hz):
    """Sliding friction: uneven catching gives hiss and board rumble and sets the sheet ringing."""
    rumble, hiss = 0, 0
    for start, length, rumble_db, hiss_db in SLIDING_PUSHES:
        force = push(start, length)
        rumble = rumble + force * from_db(rumble_db)
        hiss = hiss + force * from_db(hiss_db)
    friction = from_db(grain_db * drift(grain_hz)) * rng.standard_normal((2, N))
    catches = from_db(catch_db * drift(catch_hz))
    # bandwidth of a mode follows from its t60
    modes = [(hz, np.log(1000) / (np.pi * t60), db) for hz, db, t60 in SHEET_MODES]
    ring = rms_one(resonate(friction[0], modes))
    boards = colour(catches * friction[0], RUMBLE_SPECTRUM) + from_db(ring_db) * ring
    return rumble * boards + hiss * colour(friction[1], HISS_SPECTRUM)


def skid(grain_db, grain_hz):
    """Friction-driven resonance: steel sliding on steel rings the shoe."""
    friction = from_db(grain_db * drift(grain_hz)) * rng.standard_normal(N)
    return from_db(SKID_DB) * push(SKID_S, SKID_LENGTH_S) * rms_one(resonate(friction, SHOE_MODES))


def scene():
    """Superposition: one speed drives the whole saw; the handling falls between its two runs."""
    speed = blade_speed()
    turns = np.cumsum(speed) / SR  # strokes so far
    side = rasp(turns, speed, SIDE_SPECTRUM, HOUSING_MODES, clack_db=4.5, teeth_db=2.5,
                housing_db=-8.5, repeat_db=REPEAT_DB[0])
    front = rasp(turns, speed, FRONT_SPECTRUM, GUARD_MODES, clack_db=2, teeth_db=3.5,
                 housing_db=-14.5, repeat_db=REPEAT_DB[1])
    saw = by_run(side, front) + motor(turns, speed)
    saw += cutting(turns, snap_db=-7, grit_db=-7.0, touch_hz=726)
    saw += shaking(turns, speed) + coasting(turns, speed)
    handling = groans()
    handling += knocks(modes_db=-10.0, crack_db=-7.0, snap_db=-15.0, tail_db=-10.5, tail_t60=0.12)
    handling += deck(boom_db=-19.0, boom_t60=0.91)
    handling += slides(grain_db=3.0, grain_hz=391.4, ring_db=-15.0, catch_db=3, catch_hz=89.8)
    handling += skid(grain_db=1.5, grain_hz=253)
    far = bird(hoarse=.035, echo_db=-4.0, echo_t60=.7)
    return (saw + handling + far + yard())[None]


def record(dry):
    """Band limitation and clipping: the top is cut steeply and peaks stop at full scale."""
    steep = signal.ellip(14, .2, 80, CUTOFF_HZ, fs=SR, output="sos")
    return np.clip(signal.sosfilt(steep, dry), -1, 1)


dry = scene()
out = record(dry)
store_pcm(out)
```